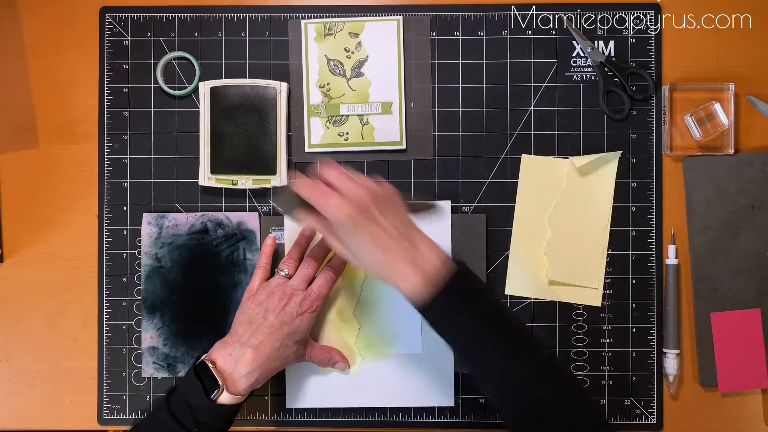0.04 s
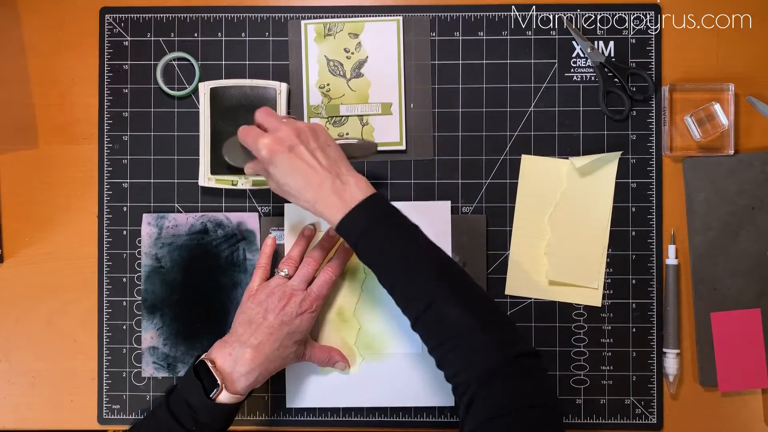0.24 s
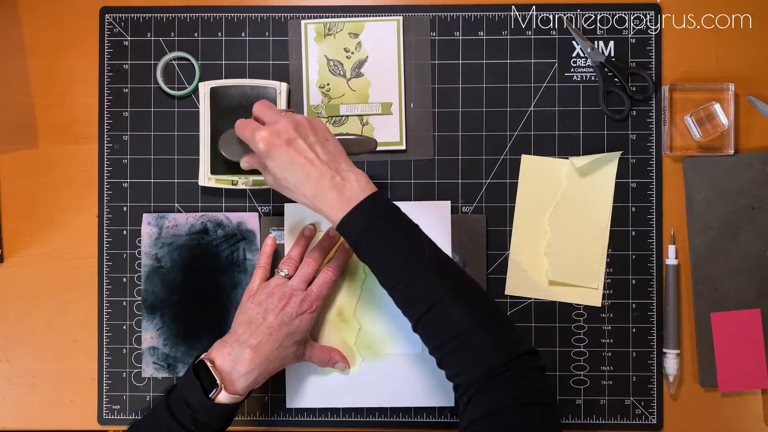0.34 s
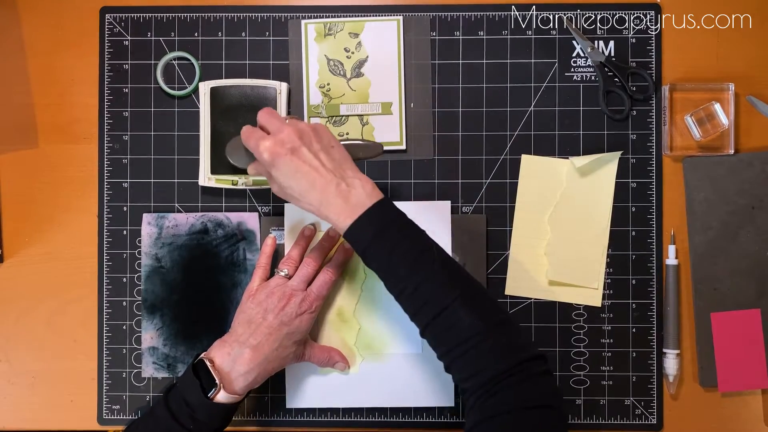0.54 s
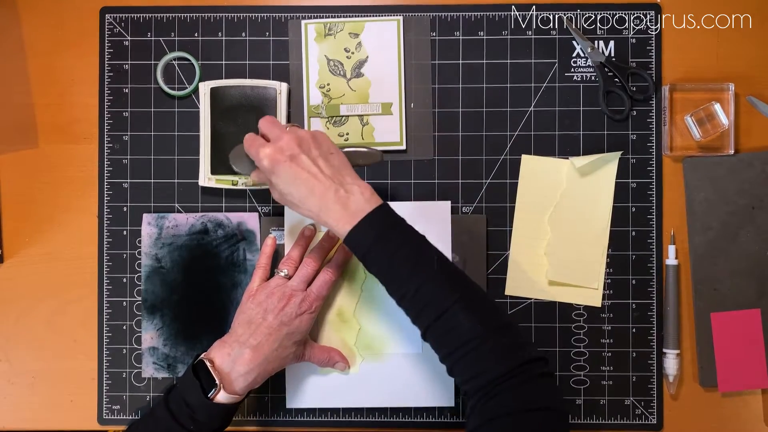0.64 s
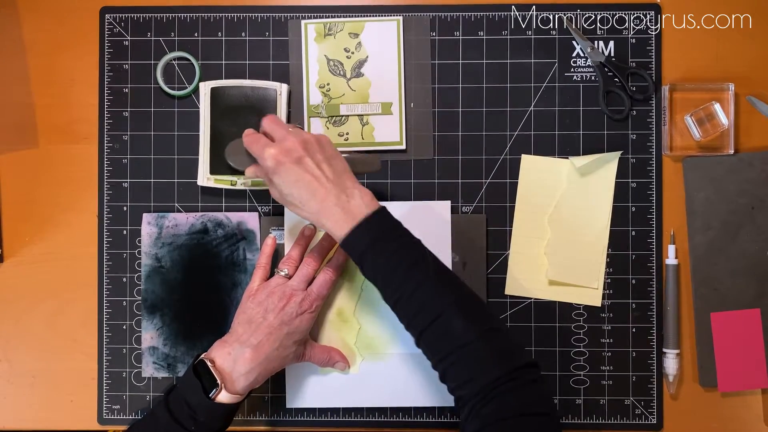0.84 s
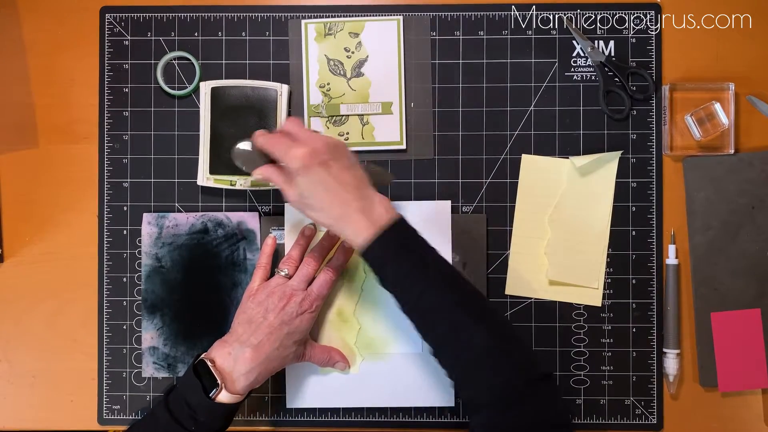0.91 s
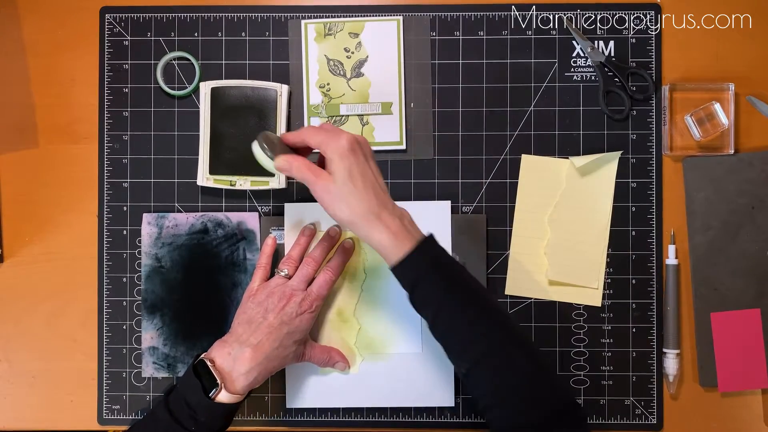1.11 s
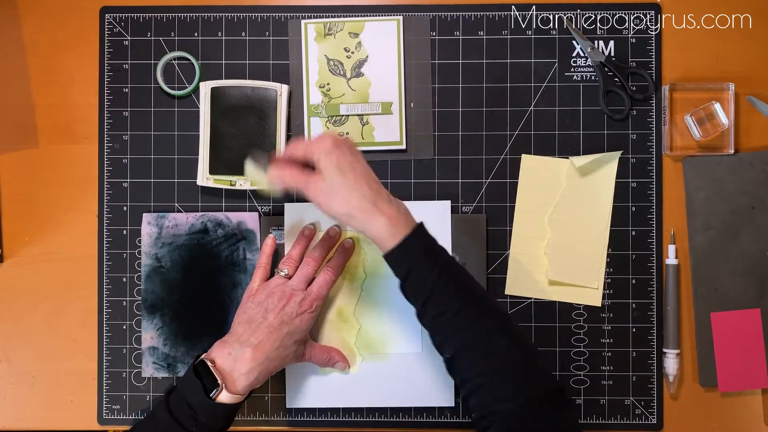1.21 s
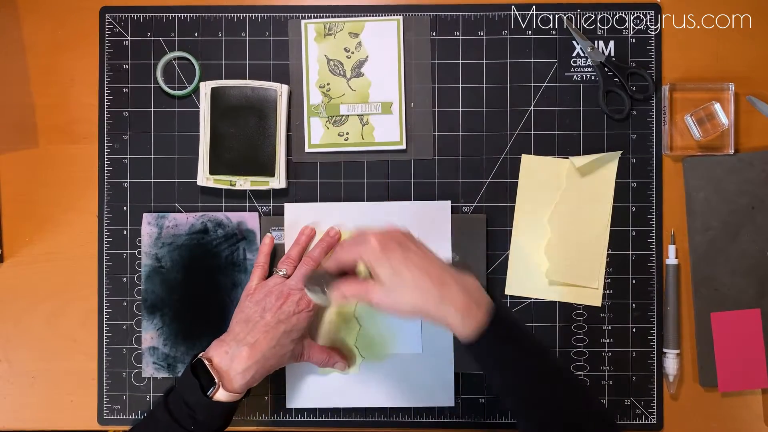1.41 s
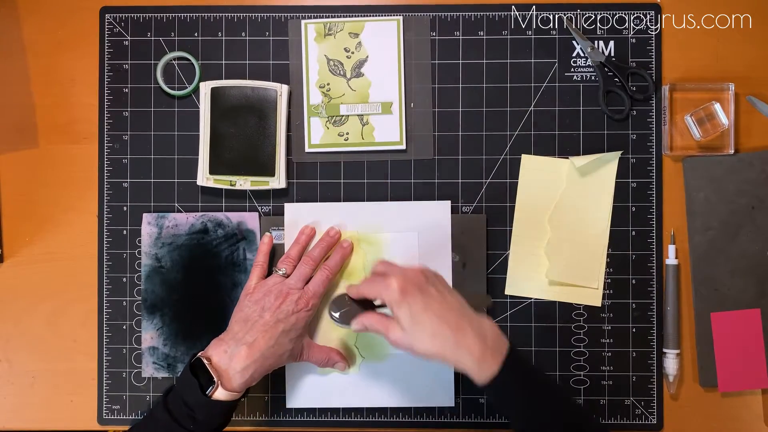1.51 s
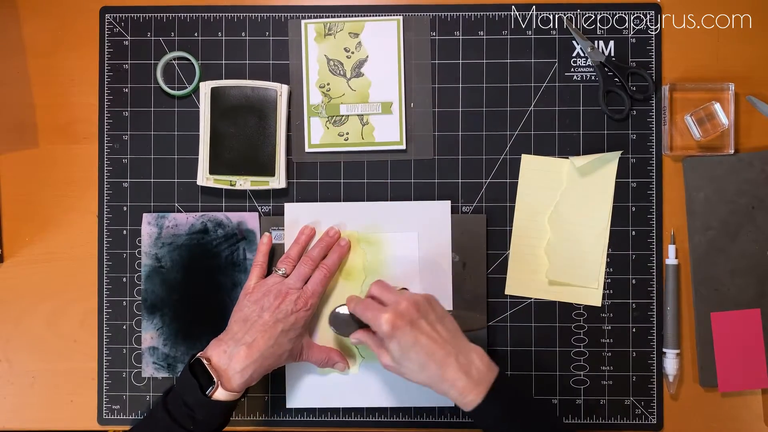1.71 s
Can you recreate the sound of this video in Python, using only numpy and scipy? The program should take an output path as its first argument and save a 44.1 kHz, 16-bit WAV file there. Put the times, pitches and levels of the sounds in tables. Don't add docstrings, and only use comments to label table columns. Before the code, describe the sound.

Four short, hollow plastic knocks from a brush on an ink pad, preceded by a brief soft bristle swish on card and followed by faint brushing and hand rustle, close up in a small quiet room.

```python
import sys
import numpy as np
from scipy import signal
from scipy.fft import rfft, irfft
from scipy.io import wavfile

SR = 44100
rng = np.random.default_rng(int(sys.argv[2]) if len(sys.argv) > 2 else 0)


def amplitude_ratio(level_db):
    exponent = np.asarray(level_db, float) / 20
    return 10 ** exponent


def wav_record(signal):
    frames = np.transpose(np.atleast_2d(signal))
    bounded = np.clip(frames, -1, 1)
    quanta = np.round(bounded * 32767).astype(np.int16)
    wavfile.write(sys.argv[1], SR, quanta)


N = 77175

# (time [s], bristle contact level [dB], hand rustle level [dB])
MOTION = [(0, -72.5, -55.5), (0.071, -65, -50), (.15, -63.5, -51), (.22, -62, -55), (.24, -74, -57),
          (.4, -87, -67), (.62, -84, -59.5), (.86, -89, -61), (.91, -74, -58.5), (.97, -75.5, -60),
          (1.049, -66.5, -53.5), (1.067, -84, -69), (1.2, -74.5, -62), (1.4, -69.5, -57.5),
          (1.502, -70, -59), (1.562, -81.5, -66), (1.6, -73, -60), (1.64, -82, -65.5)]
# (frequency [Hz], level [dB])
FIZZ_SPECTRUM = [(800, -16), (2000, -1), (4000, -4.5), (7000, -1), (10000, -2.5), (13000, -8.5),
                 (16000, -3.5)]
# (slip frequency [Hz], width [Hz])
BRISTLES = [(3500, 1300), (5800, 2300), (7800, 2100), (10500, 4000)]
SLIPS_PER_S, SLIP_SPREAD_DB, FINE_HISS = 300, 4.5, 1.1
CLUMP_DB, CLUMP_HZ = 1.2, 120
# (frequency [Hz], level [dB])
RUSTLE_SPECTRUM = [(30, -0.5), (80, 1), (200, 0.5), (400, -4), (800, -9.5), (1600, -17.5), (3200, -22)]
RUSTLE_TOP_HZ, LUMP_DB, LUMP_HZ = 4500, 2, 60

# (frequency [Hz], level [dB])
AIR_SPECTRUM = [(15, -20), (25, 4.5), (624, -19.5), (818, -21.5), (1440, -23.5), (2000, -22.5), (2280, -24),
                (2690, -32), (16000, -41.5)]
AIR_DB = -64.5

# (time [s], peak level [dB], frequency [Hz], length [ms])
SNAPS = [(.068, -47, 7500, 0.21), (.0915, -45.5, 7900, .4), (.125, -52, 6860, 0.43),
         (0.146, -45.5, 7900, .4), (.198, -45, 7950, 0.25), (.577, -53, 6130, 0.2),
         (0.5911, -46, 10600, 0.24), (0.641, -49.5, 6160, 0.41), (0.6438, -43.5, 9200, 0.11),
         (.656, -53, 5700, .3), (0.7162, -44.5, 8200, 0.28), (0.7209, -40.5, 8400, 0.25),
         (.7395, -57, 9100, 0.34), (.768, -51.5, 7200, 0.3), (0.7908, -49.5, 7650, 1.03),
         (0.795, -51, 8600, 0.42), (.899, -50, 2880, 0.4), (.9205, -58.5, 6240, 0.5),
         (0.926, -49, 6800, .5), (.9625, -58, 7100, .3), (1.0015, -37, 6300, 0.12), (1.001, -40, 2420, .15),
         (1.184, -53, 7200, 0.2), (1.2618, -47, 2730, 0.11), (1.3343, -54.5, 9600, 0.14),
         (1.364, -47.5, 7500, 0.12), (1.486, -46, 7800, 0.13), (1.59, -53, 1800, .25),
         (1.601, -54, 2970, 2.5), (1.69, -46, 4000, .04)]
SNAP_WIDTH, SNAP_WIDE_DB = 0.3, -4

# (frequency [Hz], time to fall 60 dB [s])
ROOM_DECAY = [(100, 0.61), (300, 0.4), (800, 0.38), (2000, 0.41), (5000, 0.34), (12000, 0.36)]
ROOM_DB, ROOM_GAP_S = -15.5, 0.006

# (time [s], level [dB], bounce delay [s], bounce level [dB], pitch factor [ratio])
TAPS = [
    (0.2368, -23, 0.002553, -7.5, 0.985),
    (0.4252, -21, .0033, -12.5, 1.037),
    (0.6085, -23.5, 0.0023, -8, .98),
    (0.7523, -30.5, 0.00297, -5, .97),
]
# (favoured frequency [Hz], its lift [dB], hollow-box level [dB], brightness [dB])
SPOTS = [
    (720, 7, 1, 0.5),
    (950, 5, 2, 0.5),
    (860, 2, 0, 0.5),
    (1010, 4.5, -5, 0),
]
SPOT_WIDTH_HZ, BRIGHT_HZ = 204, 1500
# (frequency [Hz], level [dB], time to fall 60 dB [s])
PAD_MODES = [(366.7, -9, 0.047), (767, -17, 0.069), (925, 1, 0.017), (1098, -1, 0.012), (1230, -25, 0.055),
             (1656, -14, 0.063), (1860, -11.5, 0.032), (2405, -9, 0.0083), (2610, -14.5, 0.022),
             (3636, -12.5, 0.013), (4600, -12.5, 0.0077)]
LONGEST_RING_S, RING_RISE_S = 0.045, 0.00054
# (frequency [Hz], level [dB])
CRACK_SPECTRUM = [(1500, 11), (3000, 12.5), (5000, -2), (7000, -6.5), (10000, -13.5), (15000, -28)]
CRACK_DB, CRACK_S = -11, 0.0035
# (frequency [Hz], level [dB], time to fall 60 dB [s])
DESK_MODES = [(46.5, -11.5, 0.082), (143.4, -17.5, 0.1)]
DESK_RISE_S = 0.0044
# (frequency [Hz], level [dB])
WASH_SPECTRUM = [(150, -17.5), (360, 0), (540, -7.5), (950, 2), (1500, -6.5), (2600, -12), (4400, -23),
                 (9000, -44)]
WASH_DB, WASH_RISE_S = -22, 0.005
ECHO_DB, ECHO_HZ = 2.5, 70
TOUCH_S, TOUCH_DB = 0.0028, -26.5

MIC_LOW_HZ, MIC_TOP_HZ = 40.8, 15850


def evened(x):
    return x / np.sqrt(np.mean(x ** 2) + 1e-20)


def read(points, hz):
    f, value = np.transpose(points)
    return np.interp(np.log(hz + 1), np.log(f + 1), value)


def colour(x, points):
    gain = amplitude_ratio(read(points, np.fft.rfftfreq(len(x), 1 / SR)))
    return irfft(rfft(x) * gain, len(x))


def add(mix, s, sound):
    part = mix[max(round(s * SR), 0):][:len(sound)]
    part += sound[:len(part)]


def wander(hz):
    u = np.fft.rfftfreq(N, 1 / SR) / hz
    return evened(irfft(rfft(rng.standard_normal(N)) * np.sqrt(u) * np.exp(-u ** 2), N))


def fizz():
    t = np.arange(-32, 32) / SR
    out = FINE_HISS * rng.standard_normal(N)
    for hz, width_hz in BRISTLES:
        hit, size = rng.random(N), rng.exponential(1, N)
        slips = (hit < SLIPS_PER_S / SR) * amplitude_ratio(SLIP_SPREAD_DB * np.minimum(size, 3))
        grain = np.exp(-(np.pi * width_hz * t) ** 2) * np.sin(2 * np.pi * hz * t)
        out = out + evened(np.convolve(slips, grain, "same")) / 2
    clumps = amplitude_ratio(CLUMP_DB * wander(CLUMP_HZ))
    return evened(colour(out, FIZZ_SPECTRUM) * clumps)


def rustle():
    low_pass = signal.butter(2, RUSTLE_TOP_HZ, fs=SR, output="sos")
    cloth = signal.sosfilt(low_pass, colour(rng.standard_normal(N), RUSTLE_SPECTRUM))
    return evened(cloth * amplitude_ratio(LUMP_DB * wander(LUMP_HZ)))


def brush():
    s, fizz_db, rustle_db = np.transpose(MOTION)
    t = np.arange(N) / SR
    return fizz() * amplitude_ratio(np.interp(t, s, fizz_db)) + rustle() * amplitude_ratio(np.interp(t, s, rustle_db))


def air():
    return amplitude_ratio(AIR_DB) * evened(colour(rng.standard_normal(N), AIR_SPECTRUM))


def snaps():
    out, ms = np.zeros(N), np.arange(512) / SR * 1000
    f = np.fft.rfftfreq(512, 1 / SR)
    broad = amplitude_ratio(SNAP_WIDE_DB) * f / (f + 3000) * np.exp(-(f / 8000) ** 2)
    for s, db, hz, length_ms in SNAPS:
        band = np.exp(-((f / hz - 1) / SNAP_WIDTH) ** 2) + broad
        hiss = irfft(rfft(rng.standard_normal(512)) * band)
        burst = hiss * ms / length_ms * np.exp(-ms / length_ms)
        add(out, s, amplitude_ratio(db) * burst / abs(burst).max())
    return out


def dying(x):
    hz, t, z = signal.stft(x, SR, nperseg=256)
    decay = amplitude_ratio(-60 * t / read(ROOM_DECAY, hz)[:, None])
    return signal.istft(z * decay, SR, nperseg=256)[1][:len(x)]


def room(x):
    echo = np.zeros(SR // 2)
    at = np.arange(0, len(echo) - 20, 20)
    echo[at + rng.integers(0, 20, len(at))] = rng.choice([-1., 1.], len(at))
    tail, out = dying(echo), np.zeros(N)
    add(out, ROOM_GAP_S, signal.fftconvolve(x, tail / np.linalg.norm(tail))[:N])
    return out


def pad_ring(t, pitch, spot):
    spot_hz, lift_db, box_db, bright_db = spot
    hz, db, t60 = np.transpose(PAD_MODES)[:, :, None]
    t60 = np.minimum(t60, LONGEST_RING_S)
    box = hz < 500
    lift = lift_db * np.exp(-((hz * pitch - spot_hz) / SPOT_WIDTH_HZ) ** 2)
    mode_db = db + lift + bright_db * (hz > BRIGHT_HZ) + box_db * box
    modes = np.where(box, 1, -1) * amplitude_ratio(mode_db - 60 * t / t60) * np.sin(2 * np.pi * hz * pitch * t)
    return modes.sum(0) * (1 - np.exp(-t / RING_RISE_S))


def contact_crack(t, bright_db):
    noise = evened(colour(rng.standard_normal(len(t)), CRACK_SPECTRUM))
    return noise * np.exp(-t / CRACK_S) * amplitude_ratio(CRACK_DB + bright_db) * (1 - np.exp(-t / RING_RISE_S))


def desk_thump(t):
    modes = sum(amplitude_ratio(db - 60 * t / t60) * np.sin(2 * np.pi * hz * t) for hz, db, t60 in DESK_MODES)
    return modes * (1 - np.exp(-t / DESK_RISE_S))


def tap_wash(t):
    echoes = amplitude_ratio(ECHO_DB * wander(ECHO_HZ)[:len(t)])
    tail = dying(evened(colour(rng.standard_normal(len(t)), WASH_SPECTRUM)))
    return amplitude_ratio(WASH_DB) * echoes * tail * (1 - np.exp(-(t / WASH_RISE_S) ** 2))


def taps():
    out, t = np.zeros(N), np.arange(SR // 2) / SR
    thump = desk_thump(t)
    for (s, level_db, bounce_s, bounce_db, pitch), spot in zip(TAPS, SPOTS):
        ring = pad_ring(t, pitch, spot)
        blow = ring + contact_crack(t, spot[3]) + thump + tap_wash(t)
        add(out, s - TOUCH_S, amplitude_ratio(level_db + TOUCH_DB) * ring)
        add(out, s, amplitude_ratio(level_db) * blow)
        add(out, s + bounce_s, amplitude_ratio(level_db + bounce_db) * ring)
    return out


def scene():
    clicks = snaps()
    return (brush() + air() + clicks + amplitude_ratio(ROOM_DB) * room(clicks) + taps())[None]


def roll_off(x):
    return signal.sosfilt(signal.butter(12, 16290, fs=SR, output="sos"), x)


def record(dry):
    high_pass = signal.butter(2, MIC_LOW_HZ, "high", fs=SR, output="sos")
    low_cut = signal.sosfilt(high_pass, dry)
    limited = signal.oaconvolve(low_cut, signal.firwin(255, MIC_TOP_HZ, fs=SR)[None], "same")
    return roll_off(limited)


dry = scene()
out = record(dry)
wav_record(out)
```